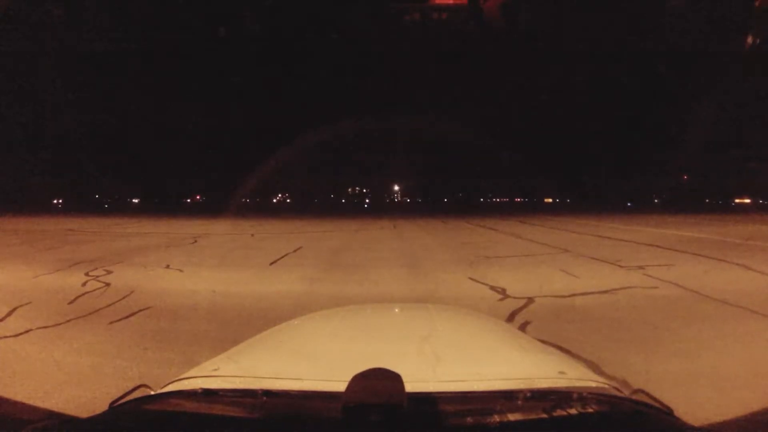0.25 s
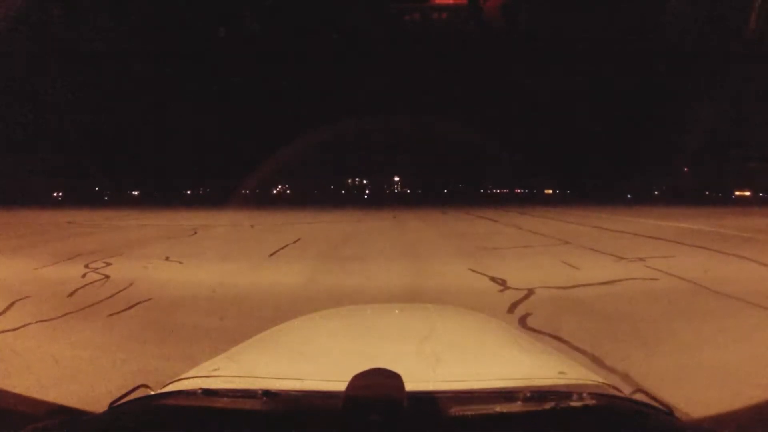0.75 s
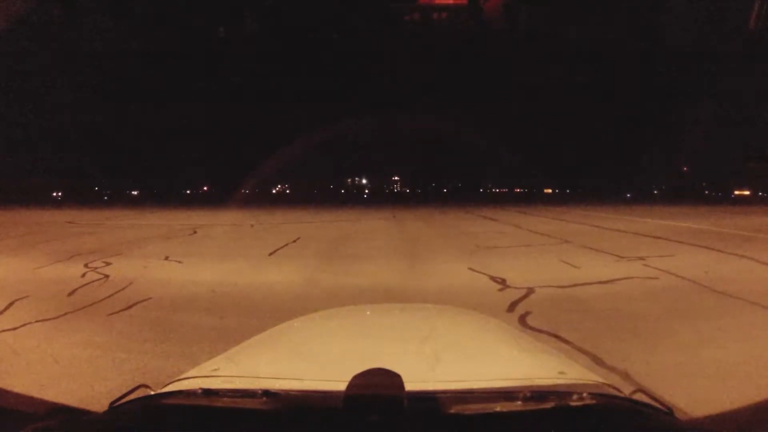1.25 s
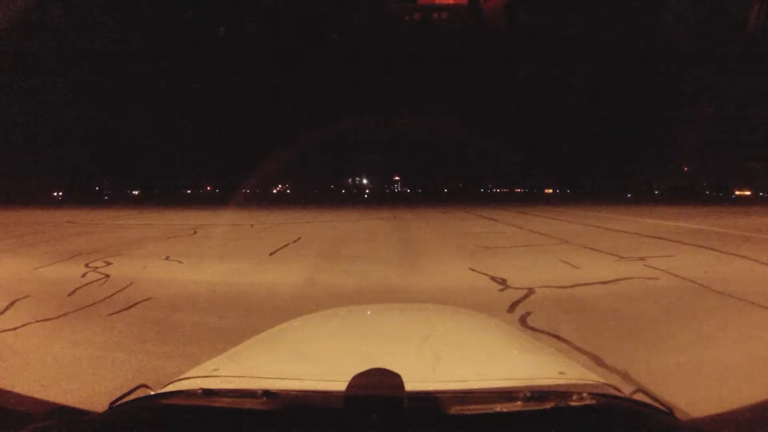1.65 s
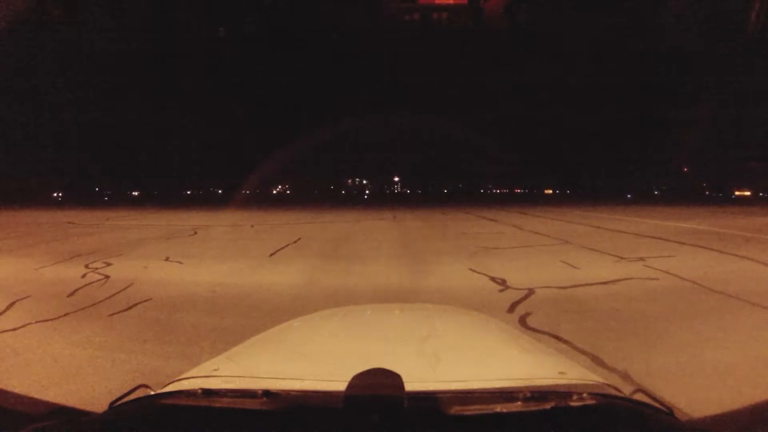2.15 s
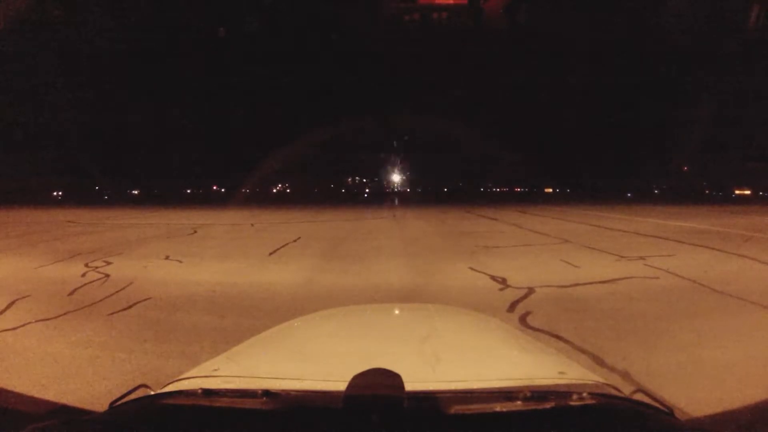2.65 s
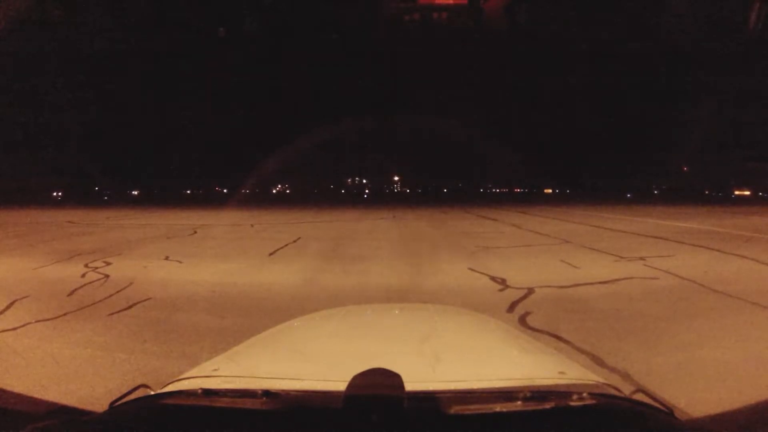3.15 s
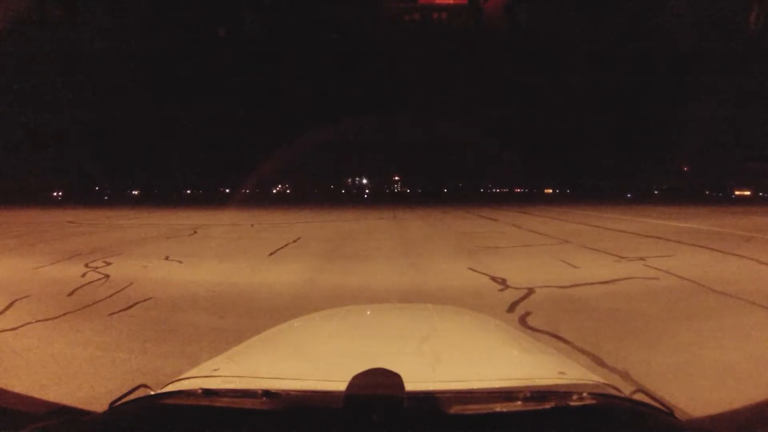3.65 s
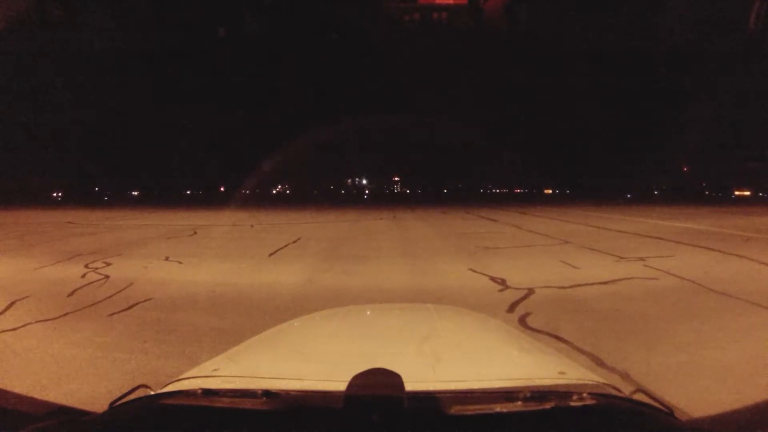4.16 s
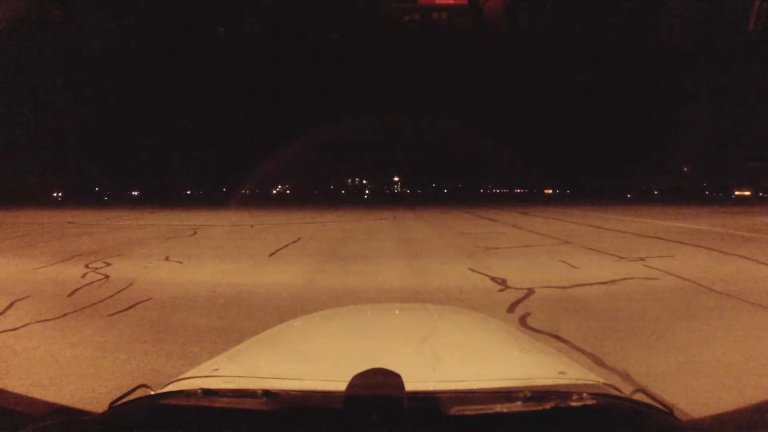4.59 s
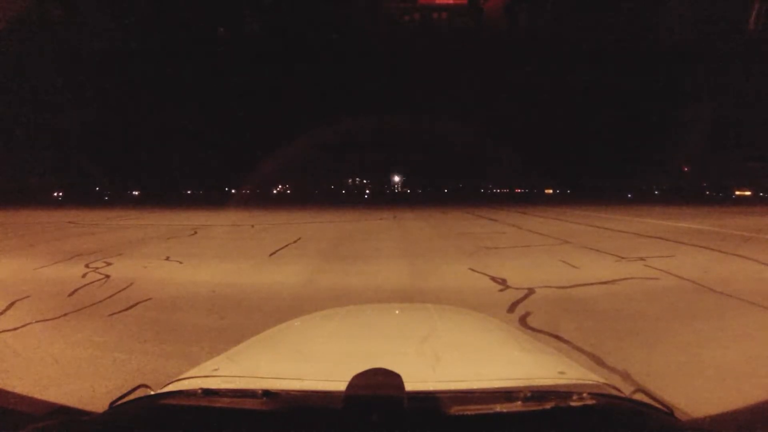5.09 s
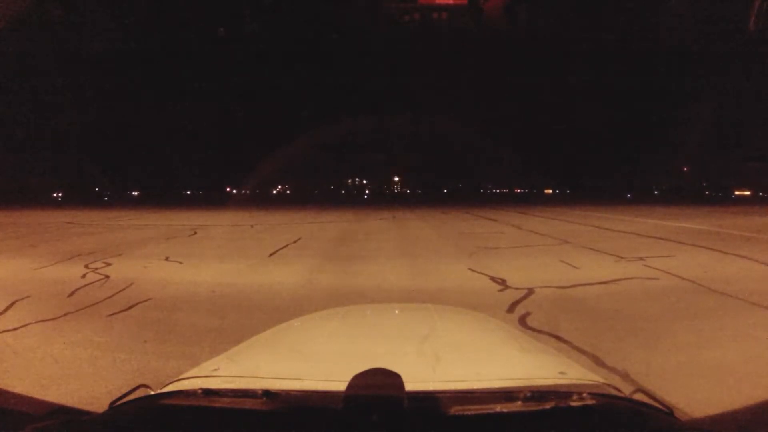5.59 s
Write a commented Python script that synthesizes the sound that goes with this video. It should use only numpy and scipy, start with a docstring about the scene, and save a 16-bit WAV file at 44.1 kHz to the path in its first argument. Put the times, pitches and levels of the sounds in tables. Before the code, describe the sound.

Mono cockpit sound of a light aircraft standing on the ground at night with its engine running. Low throbbing drone and rumble, mechanical clatter and soft hiss play continuously. Speed rises gently at first, bringing irregular hard panel rattles, faint thin whines, one dry click and short knocks. After the middle the engine slows, the boom returns strongly, whines fade, and rattles go on nearly to the end.

```python
"""In a light-aircraft cabin a four-cylinder piston engine idles fast, speeds up within a second and later sinks back.
From the start sines that follow the crank speed boom, drone and lope, with a throb that slips slowly
against the crank; coloured noise rumbles, grains clatter and hiss.
Each firing sets panel resonances buzzing and tapping; soon hard rattles, short filtered noise, join in.
Near top speed thin sine whines sing out; short dull knocks and one dry click follow.
The boom swells early and again as the speed sinks; whines fade, rattles and knocks go on nearly to the end."""
import sys
import numpy as np
from scipy import signal
from scipy.fft import rfft, irfft, next_fast_len
from scipy.io import wavfile
from scipy.ndimage import uniform_filter1d

SR = 44100
rng = np.random.default_rng(int(sys.argv[2]) if len(sys.argv) > 2 else 0)


def unload_audio(sound):
    """Save the sound as a 16-bit wav file, at the path given as the first command line argument."""
    columns = np.transpose(np.atleast_2d(sound))
    # keep every value between -1 and 1, then stretch to whole-number steps
    steps = np.round(np.clip(columns, -1, 1) * 32767)
    wavfile.write(sys.argv[1], SR, steps.astype(np.int16))


N = 257103
TIME = np.arange(N) / SR


def from_db(db):
    """Decibels to amplitude gain."""
    return 10 ** (np.asarray(db) / 20)


def rms_one(x):
    """Scale to rms 1."""
    return x / np.sqrt(np.mean(x ** 2) + 1e-20)


def in_time(rows):
    """Each column of a time curve, interpolated at every sample."""
    time_s, *columns = np.transpose(rows)
    return [np.interp(TIME, time_s, column) for column in columns]


def at_hz(points, hz):
    """Gain of a spectrum at hz, interpolated in dB over log frequency."""
    point_hz, db = np.transpose(points)
    return from_db(np.interp(np.log(hz), np.log(point_hz), db))


def colour(x, points):
    """Impose a spectrum that falls away steeply beyond its ends; rms 1."""
    size = next_fast_len(N)
    hz = np.maximum(np.arange(size // 2 + 1) * SR / size, 1)
    low_hz, high_hz = points[0][0], points[-1][0]
    ends = np.minimum(1, np.minimum(hz / low_hz, high_hz / hz)) ** 4
    return rms_one(irfft(rfft(x, size) * at_hz(points, hz) * ends, size)[:N])


def drift(turns_per_s):
    """Smooth random wandering: noise through two equal poles at 1/40 of SR; rms 1."""
    pole = np.exp(-80 * np.pi * turns_per_s / SR)
    noise = rng.standard_normal(N // 40 + 2002)
    slow = signal.lfilter([1], [1, -2 * pole, pole * pole], noise)[2000:]  # drop the filter's start
    return np.interp(np.arange(N) / 40, np.arange(len(slow)), rms_one(slow))


def resonate(x, hz, width_hz):
    """A resonance with steep skirts: Butterworth band-pass."""
    edges_hz = np.clip([hz - width_hz / 2, hz + width_hz / 2], 10, .45 * SR)
    return signal.sosfilt(signal.butter(2, edges_hz, "band", fs=SR, output="sos"), x + 1e-18)


def grains(per_s, spread_db):
    """Tiny contacts at random moments, of uneven size and sign; rms 1."""
    size_db = spread_db * np.clip(rng.standard_normal(N), -2, 2)
    signed_sizes = from_db(size_db) * rng.choice([-1, 1], N)
    return rms_one(signed_sizes * (rng.random(N) < per_s / SR))


def bursts(times_s, gains, rise_s, fall_s):
    """Envelope of bursts with a Gaussian rise and an exponential fall."""
    out = np.zeros(N)
    for time_s, gain in zip(times_s, gains):
        near = slice(max(int((time_s - .02) * SR), 0), max(int((time_s + .06) * SR), 0))
        age_s = TIME[near] - time_s
        out[near] += gain * np.exp(-np.where(age_s < 0, (age_s / rise_s) ** 2, age_s / fall_s))
    return out


# burst after each cylinder's firing: (delay [firing intervals], relative level [dB])
CYLINDERS = [(0.78, 12), (0.86, 11), (0.81, 11.5), (0.82, 10)]


def after_firings(cycles, spread_db, jitter_s, rise_s, fall_s):
    """One burst a firing, four to the cycle, each of its own strength; rms 1."""
    firing = np.arange(int(cycles[-1] * len(CYLINDERS)))
    delay, db = np.array(CYLINDERS)[firing % len(CYLINDERS)].T
    chance = np.clip(rng.standard_normal((len(firing), 2)), -2, 2)
    due_s = np.interp((firing + delay) / len(CYLINDERS), cycles, TIME)
    times_s = due_s + jitter_s * chance[:, 0]
    gains = from_db(db + spread_db * chance[:, 1])
    return rms_one(bursts(times_s, gains, rise_s, fall_s))


def line(turns):
    """A sine of rms 1 with a random starting phase."""
    return np.sqrt(2) * np.sin(2 * np.pi * (turns + rng.random()))


def strikes(rows, rise_s):
    """Rough contacts that ring and die: noise bursts through a resonance."""
    out, age_s = np.zeros(N + SR), TIME[:SR // 12]
    for time_s, db, hz, width_hz, decay_s in rows:
        swell = np.minimum(age_s / rise_s, 1) * np.exp(-age_s / decay_s)
        ring = rms_one(resonate(rng.standard_normal(len(age_s)) * swell, hz, width_hz))
        start = max(int((time_s - rise_s) * SR), 0)
        out[start:start + len(age_s)] += from_db(db) * np.sqrt(decay_s / age_s[-1]) * ring
    return out[:N]


IDLE_RPM = 1000


def by_effort(level, rpm, pull):
    """Layer gain in dB: grows with crank speed, shifts as the engine pulls or coasts."""
    idle_db, db_per_100_rpm, db_per_pull = level
    return idle_db + db_per_100_rpm * (rpm - IDLE_RPM) / 100 + db_per_pull * pull


# boom, swelling as it crosses the cabin's air resonance: (time [s], steady level [dB])
BOOM = [(.04, -22.5), (.09, -37.5), (.13, -27.5), (.2, -50), (.28, -26.5), (.47, -22), (.6, -23.5),
        (.98, -31.5), (1.25, -29.5), (1.8, -39), (2.15, -33), (2.7, -41), (3.35, -36), (3.5, -29.5),
        (4, -24.5), (4.35, -26), (4.57, -36), (4.87, -39.5), (5.4, -33.5), (5.83, -36)]
# drone: (time [s], level before waver [dB])
DRONE = [(0, -43.5), (.8, -41.5), (1.2, -36.5), (2.2, -38), (3.4, -38), (4.18, -38), (4.38, -52),
         (4.6, -43), (5.1, -41.5), (5.83, -44)]
# side lines of the boom: (time [s], lower level [dB], upper level [dB])
THROB = [(0, -55, -49), (.35, -46, -50), (1.1, -49, -54), (1.35, -53, -43), (1.85, -37.5, -50),
         (2.1, -54, -51), (2.32, -38.5, -51), (2.75, -45, -62), (3, -44, -59), (3.25, -41, -58),
         (3.6, -56, -43), (4.2, -40, -50), (4.65, -42.5, -45), (5.3, -50, -44), (5.83, -55, -39)]
THROB_MULTIPLE = 7.032  # lower side line, of the cycle rate; slightly sharp, so the throb slips
UNSTEADY_DB, UNSTEADY_PER_S = -47, 11  # boom waver from uneven combustion
DRONE_WAVER_DB, DRONE_WAVER_PER_S = 1.0, 3.0


def exhaust(cycles):
    """Boom at twice the firing rate, side lines beating with it about once a cycle, drone at three times."""
    boom = from_db(in_time(BOOM)[0]) + from_db(UNSTEADY_DB) * drift(UNSTEADY_PER_S)
    drone = from_db(in_time(DRONE)[0] + DRONE_WAVER_DB * drift(DRONE_WAVER_PER_S))
    lower, upper = from_db(in_time(THROB))
    gains = {THROB_MULTIPLE: lower, 8: boom, 9: upper, 12: drone}
    turns = cycles + .08
    return np.sqrt(2) * sum(gain * np.sin(2 * np.pi * k * turns) for k, gain in gains.items())


# cycle lines as the cabin passes them, air resonances near 120 and 170 Hz:
# (frequency [Hz], relative level [dB])
LOPE = [(12, -10.5), (20, -13.5), (40, -2), (50, -8.5), (64, 2.5), (90, -7.5), (108, 4), (119, 3.5),
        (132, -10), (155, -12), (168, -1.5), (190, -13.5), (250, -16.5), (310, -22.5), (480, -37.5)]


def lope(cycles, cycle_hz, waver, count=47):
    """Unequal cylinders put a wavering line on each remaining multiple of the cycle rate."""
    weak = [k for k in range(2, count) if k not in (7, 8, 9, 12)]
    return sum(at_hz(LOPE, k * cycle_hz) * (1 + waver * drift(2.4)) * line(k * cycles) for k in weak)


# airframe rumble: (frequency [Hz], relative density [dB per Hz])
RUMBLE = [(15, -17), (32, -7.5), (52, -14), (72, 8), (100, -1.5), (140, -1.5), (172, -8), (210, -9),
          (268, -10.5), (310, -15.5), (380, -22.5), (490, -27), (800, -26.5)]


def airframe_rumble():
    """Broad low airframe noise: coloured white noise; rms 1."""
    return colour(rng.standard_normal(N), RUMBLE)


# clatter through the firewall: (frequency [Hz], relative density [dB per Hz])
CLATTER = [(300, -32), (500, -22.5), (600, -11), (720, -11), (830, -9), (890, -20.5), (1050, -6.5),
           (1190, -7), (1270, -1.5), (1580, -3), (1930, -8.5), (2080, -12), (2700, -19), (3200, -33.5)]


def ticks(cycles):
    """Valve gear and pistons: dense contacts that throb with the firings, coloured by firewall and cowling."""
    throb = after_firings(cycles, spread_db=3.5, jitter_s=0.0035, rise_s=0.0032, fall_s=0.0076)
    return colour(grains(per_s=2500, spread_db=0.5) * (1 + 0.3 * throb), CLATTER)


# valve train and gears: (frequency [Hz], relative density [dB per Hz])
VALVE_TRAIN = [(470, -15.5), (590, -5), (680, -6.5), (770, 3), (900, -12), (1280, -8), (1600, -5.5),
               (2000, -8.5)]


def valve_train(cycles, count=1000):
    """The same run of contacts every cycle, so its fine comb of lines glides with the crank."""
    pattern = rng.standard_normal(count)
    return colour(np.interp(cycles % 1, np.linspace(0, 1, count), pattern), VALVE_TRAIN)


# cowling and airframe rings: (frequency [Hz], width [Hz], relative level [dB])
AIRFRAME_MODES = [(346, 32, -23), (715.5, 52, -16), (782, 49, -12), (1248, 80, -12), (2510, 107, -17),
                  (4704, 110, -27), (5345, 180, -24.5)]


def airframe_rings():
    """Cowling and airframe resonances kept ringing by steady noise."""
    out = np.zeros(N)
    for hz, width_hz, db in AIRFRAME_MODES:
        out += from_db(db) * rms_one(resonate(rng.standard_normal(N), hz, width_hz))
    return out


# hiss of air and accessories: (frequency [Hz], relative density [dB per Hz])
HISS = [(1500, -14.5), (2900, 0.5), (3900, -6.5), (4700, 0), (5450, -5), (6200, -14), (7700, -12.5),
        (9000, -23.5), (10500, -20), (12800, -27), (15000, -36)]


def hiss(cycles):
    """Air and accessories: very dense grains that puff with the firings."""
    puffs = after_firings(cycles, spread_db=3.0, jitter_s=0.003, rise_s=0.004, fall_s=0.005)
    return colour(grains(per_s=12000, spread_db=8.0) * (1 + 0.33 * puffs), HISS)


def clatter(cycles):
    """Engine clatter: sum of ticks, valve train, rings and hiss."""
    mechanical = from_db(-0.5) * ticks(cycles) + from_db(-11.5) * valve_train(cycles)
    return mechanical + airframe_rings() + from_db(-15) * hiss(cycles)


# loose panels: (frequency [Hz], width [Hz], relative level [dB])
PANEL_MODES = [(1670, 660, -3), (2360, 200, -7.5), (2590, 190, -5.5), (3490, 260, -11.5), (4680, 420, -13),
               (5470, 770, -17.5), (8000, 1900, -27.5), (10050, 2000, -23), (12500, 600, -41)]


def panels(cycles, buzz_db):
    """Firings shake loose panels into a short buzz, each partly on its own; hard rattles reach them all."""
    firings = after_firings(cycles, spread_db=0.0, jitter_s=0.0022, rise_s=0.004, fall_s=0.011)
    shake = from_db(buzz_db - 7.0) * firings
    time_s, db, _, _ = np.transpose(RATTLES)
    hard = bursts(time_s - 0.0015, from_db(db - 5.0), rise_s=0.0026, fall_s=0.0069)
    out = np.zeros(N)
    for hz, width_hz, level_db in PANEL_MODES:
        own_shake = shake * from_db(3.4 * np.clip(drift(23), -2, 2))
        force = np.hypot(own_shake, hard)
        buzz = resonate(grains(per_s=4100, spread_db=3.5) * force, hz, width_hz)
        # the square root keeps the level independent of width
        out += from_db(level_db) * np.sqrt(SR / 2 / width_hz) * buzz
    return out


# tapping panels: (centre ring frequency [Hz], width [Hz], decay [s],
# level at idle before spread [dB], speed slope [dB per 100 rpm])
TAPS = [(2688, 210, 0.0029, -55.5, 2.5), (3475, 290, .002, -59.5, 0.1)]


def taps(cycles, rpm, delay, weakest_db, strongest_db, scatter_hz):
    """An even chatter: each panel taps once after each firing, at a slightly different pitch every time."""
    firing = np.arange(int(4 * cycles[-1]))
    times_s = np.interp((firing + delay) / 4, cycles, TIME)
    rows = []
    for centre_hz, width_hz, decay_s, idle_db, speed_db in TAPS:
        levels_db = by_effort((idle_db, speed_db, 0), np.interp(times_s, TIME, rpm), 0)
        for time_s, level_db in zip(times_s, levels_db):
            db = level_db + rng.uniform(weakest_db, strongest_db)
            hz = centre_hz + scatter_hz * rng.uniform(-1.02, 1)
            rows.append((time_s, db, hz, width_hz, decay_s))
    return strikes(rows, rise_s=0.00198)


# hardest panel slaps: (time [s], level [dB], ring frequency [Hz], flurry length [s])
RATTLES = [(0.159, -53, 2680, 0.004), (0.369, -46.5, 2640, 0.015), (0.427, -50, 2610, 0.0066),
           (0.454, -47, 2600, 0.0043), (1.008, -49, 2700, 0.0053), (1.098, -48, 2670, 0.01),
           (1.263, -47, 2640, 0.005), (1.297, -47.5, 2710, 0.0073), (1.403, -48, 2600, 0.013),
           (1.484, -46.5, 2730, 0.01), (1.51, -50, 2730, 0.006), (1.678, -48, 2680, 0.0068),
           (1.784, -49, 2690, 0.007), (1.86, -59, 2740, 0.005), (1.894, -49, 2640, 0.005),
           (2.171, -45.5, 2670, 0.0076), (2.239, -48, 2800, 0.013), (2.257, -47, 2670, 0.004),
           (2.307, -46, 2560, 0.005), (2.329, -47, 2630, 0.008), (2.357, -46, 2700, 0.0043),
           (2.375, -48, 2640, 0.008), (2.404, -42.5, 2710, 0.0035), (2.479, -48, 2690, 0.011),
           (2.576, -45.5, 2760, 0.0089), (2.628, -45, 2620, 0.005), (2.677, -45, 2670, 0.005),
           (2.708, -51, 2600, 0.0053), (2.776, -45.5, 2680, 0.005), (2.826, -42.5, 2610, 0.0062),
           (2.925, -46, 2800, 0.007), (2.981, -47, 2670, 0.005), (3.036, -48.5, 2820, 0.007),
           (3.053, -50, 2600, 0.0042), (3.208, -49, 2660, 0.0057), (3.233, -45.5, 2640, 0.006),
           (3.439, -48, 2710, 0.01), (3.546, -48, 2800, 0.0095), (3.656, -47, 2670, 0.007),
           (3.695, -48.5, 2660, 0.008), (3.804, -48, 2690, 0.0087), (3.859, -47.5, 2620, 0.005),
           (3.913, -47, 2560, 0.007), (4, -46.5, 2590, 0.0054), (4.106, -44.5, 2550, 0.0044),
           (4.236, -51, 2730, 0.0066), (4.276, -47, 2620, 0.004), (4.533, -48, 2700, 0.006),
           (4.565, -57, 2560, 0.004), (4.906, -44, 2630, 0.0066), (5.033, -45.5, 2540, 0.0076),
           (5.155, -45, 2670, 0.0039), (5.217, -47.5, 2570, 0.0047), (5.51, -43.5, 2660, 0.012),
           (5.623, -47.5, 2650, 0.0035), (5.742, -49.5, 2670, 0.0031)]


def rattles(width_hz, lead_s):
    """A panel that slaps hard: a short flurry of contacts that rings near one pitch."""
    out, age_s = np.zeros(N + SR), TIME[:SR // 16] - 1 / 32
    for time_s, db, hz, length_s in RATTLES:
        flurry = rng.standard_normal(len(age_s)) * np.exp(-np.pi * (age_s / length_s) ** 2)
        ring = rms_one(resonate(flurry, hz, width_hz))
        start = max(int((time_s - lead_s + age_s[0]) * SR), 0)
        out[start:start + len(age_s)] += from_db(db) * np.sqrt(length_s / np.ptp(age_s)) * ring
    return out[:N]


# engine lines near top speed: (multiple of the cycle rate, level before fade and waver [dB])
WHINES = [(35, -65), (36, -60.5), (38, -66.5), (41, -64), (46, -73), (47, -75)]


def whines(cycles, cycle_hz, top_hz, fade_db_per_hz):
    """Thin, wavering engine lines that fade as the cycle rate falls below top_hz."""
    swell = from_db(-fade_db_per_hz * np.maximum(top_hz - cycle_hz, 0))
    return swell * sum(from_db(db) * (1 + 0.43 * drift(2.5)) * line(k * cycles) for k, db in WHINES)


# engine bay and cowling: (time [s], level [dB], ring frequency [Hz], width [Hz], decay [s])
KNOCKS = [(.867, -44, 1590, 1440, .011), (1.858, -36, 1400, 480, 0.0041), (1.956, -42, 1530, 696, 0.0047),
          (2.008, -40.5, 1460, 695, .004), (2.187, -40, 1530, 496, 0.0053), (2.483, -37, 1560, 700, 0.0039),
          (3.505, -46, 710, 210, 0.015), (4.271, -37, 1380, 490, 0.0014),
          (5.333, -46.5, 1600, 1190, 0.0082), (5.455, -44.5, 1700, 1300, 0.0029)]


def knocks():
    """Dull, short knocks of engine bay and cowling: damped, ringing noise."""
    return strikes(KNOCKS, rise_s=0.00101)


def click():
    """One thin, dry click: an impulse through a one-pole filter."""
    impulse = np.zeros(N)
    impulse[int(1.437 * SR)] = 1
    return from_db(-32.0) * signal.lfilter([1], [1, -.7], impulse)


# crankshaft: (time [s], speed [rpm])
RPM = [(0, 983), (.45, 1108), (.7, 1149), (1, 1179), (1.4, 1187), (1.9, 1204), (2.85, 1204), (3.3, 1183),
       (3.7, 1137), (4.5, 1036), (4.9, 1003), (5.3, 992), (5.55, 1010), (5.83, 1000)]
# layer gains: (at idle [dB], speed slope [dB per 100 rpm], pull slope [dB per 100 rpm gained a second])
RUMBLE_LEVEL = (-42.5, 1.65, 0.64)
LOPE_LEVEL = (-53, 0.62, 0.23)
CLATTER_LEVEL = (-49.5, 1.86, 0.13)
BUZZ_LEVEL = (-53.5, 0.4, -0.98)


def scene():
    """Crank speed drives the engine layers; a four-stroke cycle takes two turns."""
    rpm, = in_time(RPM)
    # pull: hundreds of rpm gained a second
    pull = np.gradient(uniform_filter1d(rpm, SR // 4, mode="nearest")) * SR / 100
    cycle_hz = rpm / 120
    cycles = np.cumsum(cycle_hz) / SR

    uneven = from_db(by_effort(LOPE_LEVEL, rpm, pull)) * lope(cycles, cycle_hz, waver=0.23)
    rumble = from_db(by_effort(RUMBLE_LEVEL, rpm, pull)) * airframe_rumble()
    bay = from_db(by_effort(CLATTER_LEVEL, rpm, pull)) * clatter(cycles)
    loose = panels(cycles, by_effort(BUZZ_LEVEL, rpm, pull))
    loose += taps(cycles, rpm, delay=.82, weakest_db=-9.5, strongest_db=5, scatter_hz=170)
    loose += rattles(width_hz=283, lead_s=0.001488)
    singing = whines(cycles, cycle_hz, top_hz=9.9, fade_db_per_hz=14.0)
    return (exhaust(cycles) + uneven + rumble + bay + loose + singing + knocks() + click())[None]


STOPBAND_HZ = 15000


def record(dry):
    """Open softly over 3 ms; low-pass to 60 dB down from STOPBAND_HZ up."""
    dry = dry * np.minimum(TIME / .003, 1)
    return signal.sosfilt(signal.cheby2(12, 60, STOPBAND_HZ, fs=SR, output="sos"), dry)


dry = scene()
out = record(dry)
unload_audio(out)
```